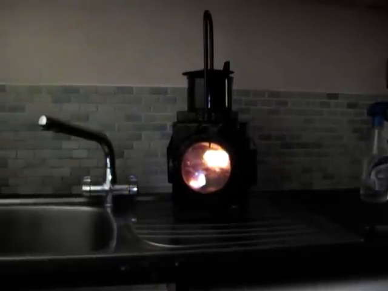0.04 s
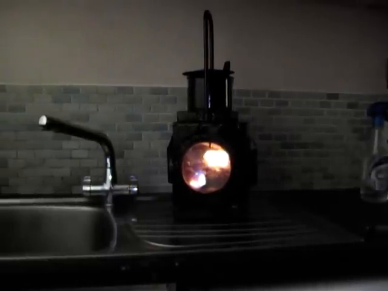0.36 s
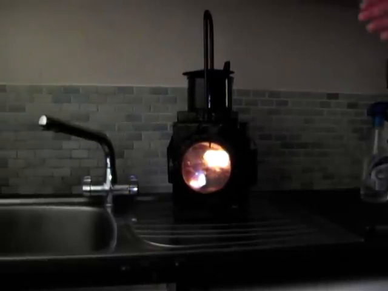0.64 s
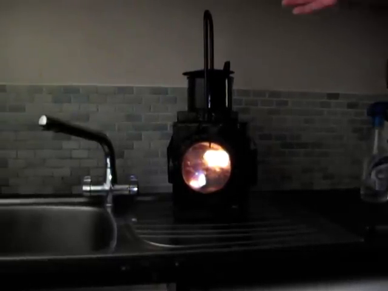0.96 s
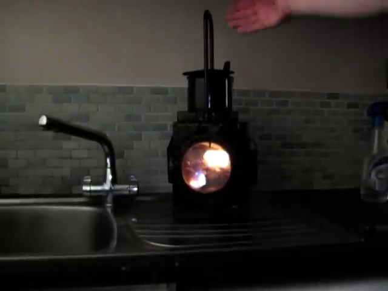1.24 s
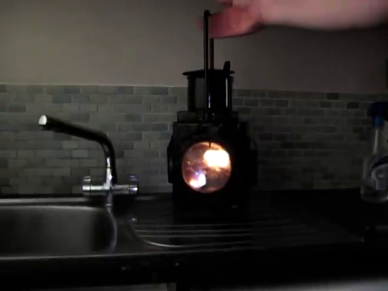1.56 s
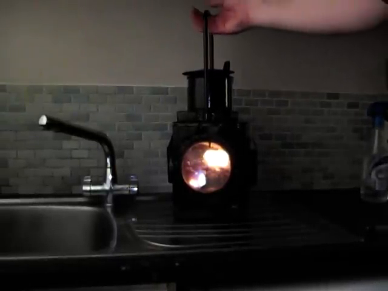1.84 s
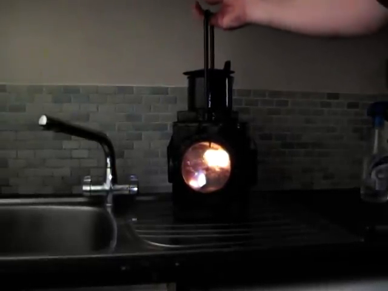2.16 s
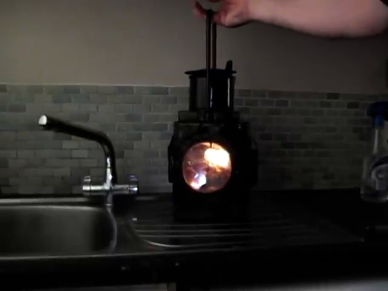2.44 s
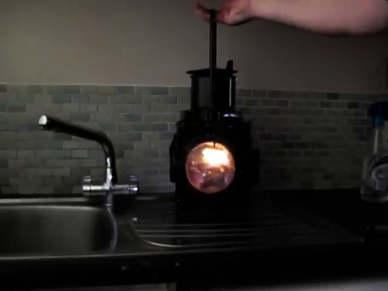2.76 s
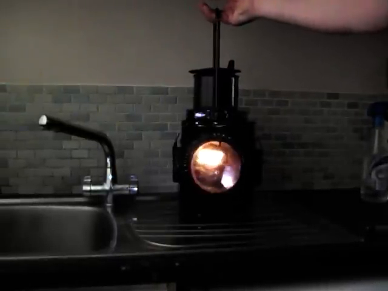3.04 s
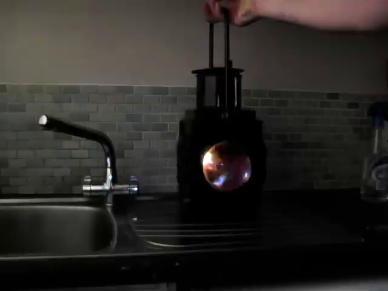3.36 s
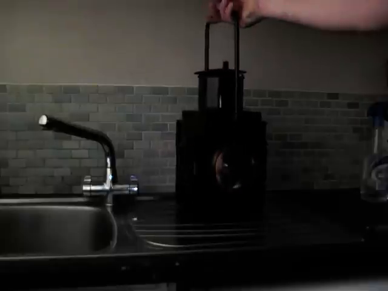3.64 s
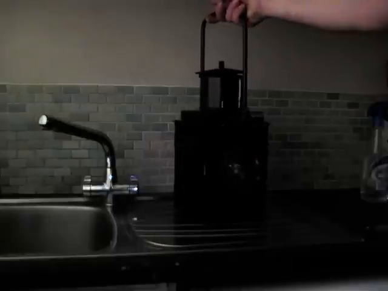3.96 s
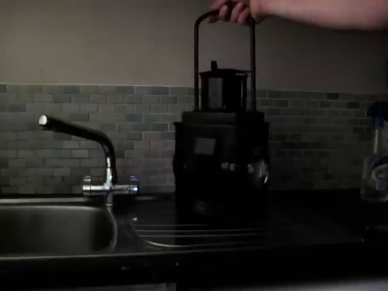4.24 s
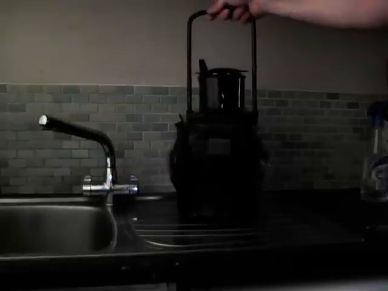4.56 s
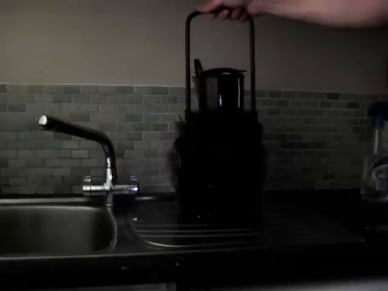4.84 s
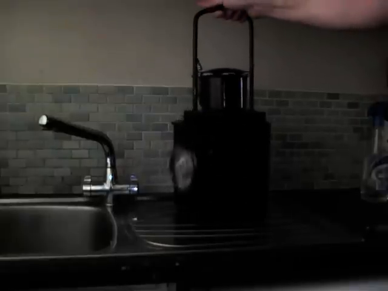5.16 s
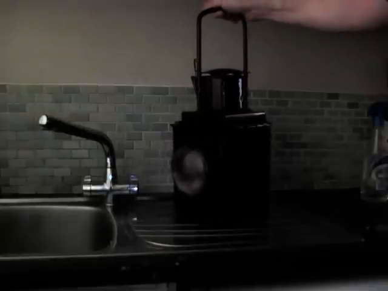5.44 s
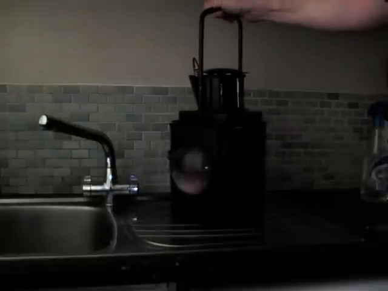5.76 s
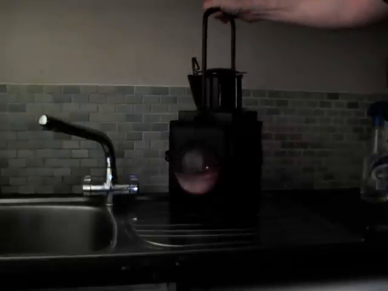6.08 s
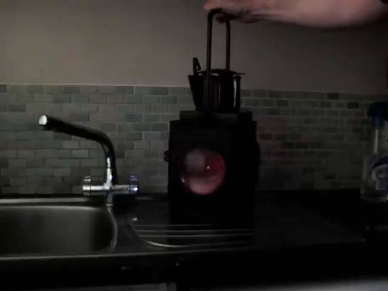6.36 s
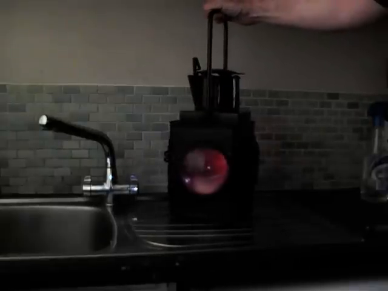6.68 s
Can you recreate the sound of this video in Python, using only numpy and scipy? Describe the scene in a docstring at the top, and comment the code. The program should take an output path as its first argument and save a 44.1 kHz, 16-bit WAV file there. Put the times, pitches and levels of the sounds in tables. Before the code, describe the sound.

A hand grips a steel lamp and turns it on a metal draining board, with ringing clunks, knocks and scraping.

```python
"""Paraffin lamp on a steel draining board

A hand rustles up to a steel paraffin lamp, grips its handle and turns it on a draining board.
The base catches on the ribs and drops with clunks that ring the thin sheet and the lamp's hollow body;
in between it drags, hisses and squeaks. A small kitchen's faint fan-like hum and hiss lie underneath."""
import sys
import numpy as np
from scipy import signal
from scipy.io import wavfile

SR = 44100
rng = np.random.default_rng(int(sys.argv[2]) if len(sys.argv) > 2 else 0)


def unload_wav(signal):
    """Save mono or channel-first audio to the path in sys.argv[1] as 16-bit WAV at rate SR, clipped to [-1, 1]."""
    wavfile.write(
        sys.argv[1],
        SR,
        np.round(np.clip(np.atleast_2d(signal).T, -1, 1) * 32767).astype(np.int16),
    )


N = 304731
BAND_EDGES = 25 * 2 ** np.arange(0, 9.5, .425)
BAND_HZ = np.sqrt(BAND_EDGES[1:] * BAND_EDGES[:-1])

# the base dropping on the board, and at 5.401 s scuffing it; boom is high mid-sheet and low near a rib: # (time
# [s], strength [dB], contact time [ms], boom [dB])
DROPS = [(3.743, -19, 0.035, -3), (3.845, -37, 0.014, -9), (3.853, -20.5, 0.21, -1.5),
         (3.957, -22.5, 0.041, -2), (4.044, -28, 0.15, -2), (4.175, -30, 0.34, -2), (4.276, -26, 0.85, -1),
         (4.552, -16.5, 1.7, 0.5), (4.662, -18, 0.21, 7), (4.667, -12, 0.32, -1),
         (4.799, -17.5, 0.33, -3.5), (4.901, -27.5, 0.078, -5), (5.121, -31, 0.015, 2.5),
         (5.222, -25.5, 0.36, -1), (5.236, -31.5, 0.0063, 1.5), (5.401, -32.5, 0.12, -1.5),
         (5.474, -22, 0.061, -0.5), (5.585, -20.5, 0.6, 2), (5.632, -23, 0.29, 0.5),
         (5.769, -34.5, 0.073, 4), (6.4, -34, 0.91, 0), (6.463, -16.5, 1.74, -0.5), (6.472, -37, 0.07, 1),
         (6.498, -19, 2.17, 3), (6.607, -32, 2.8, 2)]
# crowded overtones of sheet steel, blended by the room: (frequency [Hz], band level [dB])
STEEL_SPECTRUM = [(30, -29), (95, -7), (165, -2.5), (240, -7.5), (340, -6), (700, -7), (1100, -11.5),
                  (2200, -13), (3500, -8.5), (6500, -7), (9500, -3), (15000, -18.5)]
# how those overtones die away: (frequency [Hz], t60 [s])
STEEL_DECAY = [(60, 0.42), (170, 0.49), (400, 0.53), (800, 0.35), (2000, 0.26), (5000, 0.19), (9500, 0.18),
               (14000, 0.11)]
# modes of the lamp's body: (frequency [Hz], level [dB], t60 [s])
LAMP_MODES = [(159.5, 4.5, 0.52), (429.4, -0.5, 0.59), (787, -13, 0.47), (954, -2.5, 0.3), (1273, -5, 0.11),
              (1865, 0, 0.13)]
# stereo width of lamp, board and hand: (frequency [Hz], side minus mid [dB])
STEREO_WIDTH = [(100, -23.5), (1200, -20), (2400, -18), (4400, -12.5), (8000, -7), (14000, 2)]


def base_drops(bands):
    """The base falls off the ribs: the sheet clatters and booms, and the lamp rings along."""
    out = clatter(DROPS, drop_db, bands, level_db=-3.5)
    out += ringing(DROPS, drop_db, board_modes, level_db=-1.5)
    out += ringing(DROPS, drop_db, lambda s: LAMP_MODES, level_db=-20)
    return out + panel_shimmer()


def strike_db(blow, hz):
    """A blow's drive at each pitch: a long, soft contact thuds, a short, hard one ticks."""
    # how lamp and board answer a perfectly sharp blow: (frequency [Hz], level [dB])
    response = [(150, -7), (400, 1), (1500, 5.5), (8000, -2.5)]
    strength_db, contact_ms = blow[1:3]
    corner_hz = 1000 / (2 * contact_ms)
    treble_loss_db = 29 * np.log10(np.hypot(1, hz / corner_hz))
    return strength_db + at_hz(response, hz) - treble_loss_db


def drop_db(drop, hz):
    """A drop's drive at each pitch: boom feeds the sheet's main mode at the cost of the deep thud."""
    # where the boom goes: (frequency [Hz], share of the boom [ratio])
    boom_share = [(150, -1.1), (370, 1), (900, 0)]
    return strike_db(drop, hz) + drop[-1] * at_hz(boom_share, hz)


def clatter(blows, drive, bands, level_db, crack_db=8, crack_s=0.0045, crack_hz=2500,
            swell_s=0.0073, likeness=0.46, snap_db=19):
    """Dense steel overtones: the share `likeness` repeats, the rest changes as the contact point moves."""
    t, hz, out = np.arange(SR * 3 // 5) / SR, BAND_HZ[:, None], np.zeros((2, N))
    swell_hz, snap_hz, hard_contact_ms = 410, 8000, 0.12
    # bending waves spread through the sheet more slowly at low pitch
    swell = 1 - np.exp(-t / (swell_s * np.sqrt(swell_hz / hz)))
    # a hard contact snaps at once; early reflections follow as a crack
    snap = from_db(snap_db) * hz / (hz + snap_hz) * np.exp(-t / 0.0012)
    crack = from_db(crack_db) * hz / (hz + crack_hz) * np.exp(-t / crack_s)
    body = swell * (from_db(-60 * t / at_hz(STEEL_DECAY, hz)) + crack)
    repeated = likeness ** .5 * noise_bands(len(t), STEREO_WIDTH)
    for blow, start in zip(blows, rng.integers(0, N - len(t), len(blows))):
        s, _, contact_ms = blow[:3]
        gains = from_db(level_db + drive(blow, BAND_HZ) + at_hz(STEEL_SPECTRUM, BAND_HZ))
        envelope = body + snap / (1 + (contact_ms / hard_contact_ms) ** 2)
        fresh = (1 - likeness) ** .5 * bands[..., start:start + len(t)]
        add(out, s, np.tensordot(gains, envelope[:, None] * (repeated + fresh), 1))
    return out


def ringing(blows, drive, modes_at, level_db, spread_db=4.0, detune=0.0046, build_cycles=0.56):
    """Strong modes build over a cycle or so, a little different in pitch and level at every blow."""
    t, out = np.arange(SR // 2) / SR, np.zeros((2, N))
    for blow in blows:
        hz, mode_db, t60 = np.transpose(modes_at(blow[0]))
        strength, shift, sign = rng.standard_normal((3, len(hz)))
        attack = 1 - np.exp(-np.outer(hz, t) / build_cycles)
        decay = from_db(-60 * t / t60[:, None])
        gains = np.sign(sign) * from_db(level_db + mode_db + drive(blow, hz) + spread_db * np.tanh(strength))
        waves = np.sin(np.outer(2 * np.pi * hz * (1 + detune * shift), t)) * attack * decay
        add(out, blow[0], (pan(hz) * gains) @ waves)
    return out


def board_modes(s, main_t60_s=0.37):
    """The board's modes at time s: the main one shifts as the lamp's weight moves over the sheet."""
    # the sheet's steady modes: (frequency [Hz], level [dB], t60 [s])
    steady_modes = [(57, -14, 0.47), (107.5, -16.5, 0.78), (147.3, 1, 0.3), (182.5, -2.5, 0.38),
                    (227.8, -15.5, 0.85), (322.7, -6, 0.42), (515, -28, 0.29), (742.7, -6.5, 0.22),
                    (915, -21.5, 0.54), (1375, -17, 0.45), (2880, -8, 0.06)]
    # its main mode: (time [s], frequency [Hz], level [dB])
    main_mode = [(4.2, 357, -3), (4.6, 367.7, -4), (5.22, 357, 4), (5.47, 368.5, -7), (5.7, 403, -4)]
    times, hz, db = np.transpose(main_mode)
    return steady_modes + [(np.interp(s, times, hz), np.interp(s, times, db), main_t60_s)]


def panel_shimmer(level_db=-14, decay_scale=0.97, spread_db=6.5, count=60):
    """Thin modes of the lamp's panels: each drop brings out a different handful."""
    t, out = np.arange(SR * 2 // 5) / SR, np.zeros((2, N))
    hz = np.geomspace(520, 9000, count) * rng.uniform(.98, 1.02, count)
    t60 = decay_scale * at_hz(STEEL_DECAY, hz)
    waves = np.sin(np.outer(2 * np.pi * hz, t)) * from_db(-60 * t / t60[:, None])
    sides = stereo(1, rng.standard_normal(count), STEREO_WIDTH, hz)
    for drop, (strength, sign) in zip(DROPS, rng.standard_normal((len(DROPS), 2, count))):
        mode_db = level_db + drop_db(drop, hz) + at_hz(STEEL_SPECTRUM, hz) + spread_db * np.tanh(strength)
        add(out, drop[0], (sides * np.sign(sign) * from_db(mode_db)) @ waves)
    return out


def dragging(bands, rumble_db=7, singing_db=-9, singing_width_hz=33, flicker_db=4, grit_db=3.2):
    """The sliding base judders the board, grates over its fine scratches and sings faintly."""
    # pressure of the sliding base, heard as its hiss: (time [s], level [dB])
    pressure = [(3.3, -62.5), (3.62, -57), (4.07, -69.5), (4.29, -53.5), (4.7, -61), (4.97, -55.5),
                (5.34, -49), (5.47, -54), (5.84, -59.5), (6.44, -64), (6.6, -75.5), (6.9, -56.5)]
    # the juddering board: (frequency [Hz], density [dB])
    rumble_spectrum = [(35, -19), (60, -0.5), (160, 2), (240, -6.5), (360, 5.5), (550, -14.5), (750, -4),
                       (3000, -21), (8000, -37)]
    # steel grating on steel: (frequency [Hz], density [dB])
    hiss_spectrum = [(700, 6), (1800, 8), (3500, 4), (9500, 4), (13000, -3), (16000, -26)]
    # pitches at which the base sings: (frequency [Hz])
    singing_hz = [3087, 3580]
    pressure_db = in_time(pressure)
    ease_in = np.clip((np.arange(N) / SR - pressure[0][0]) / 0.36, 0, 1)
    rumble = np.hypot(from_db(pressure_db + rumble_db), rocking()) * coloured(bands, rumble_spectrum)
    # the hiss flickers at random in each band
    flicker = np.array([from_db(flicker_db * wobble(70).astype(np.float32)) for _ in BAND_HZ])
    grain = rms_one(from_db(grit_db * wobble(900)))
    grit = grain * coloured(bands[..., ::-1] * flicker[:, None], hiss_spectrum)
    singing = rms_one(sum(resonate(rng.standard_normal(N), hz, singing_width_hz) for hz in singing_hz))
    return ease_in * (rumble + from_db(pressure_db) * (grit + from_db(singing_db) * singing))


def rocking(judder_hz=256, level_db=-14, t60_s=0.46):
    """Envelope of the lamp's judder on the board, dying away after each drop."""
    t, power = np.arange(SR) / SR, np.zeros(N)
    for drop in DROPS:
        add(power, drop[0], from_db(drop_db(drop, judder_hz) + level_db - 60 * t / t60_s) ** 2)
    return np.sqrt(power)


def squeaks(waver=0.064):
    """Steel sticks and slips on steel in brief tones of unsteady pitch."""
    # stick-slip chirps: (time [s], frequency [Hz], level [dB], length [s])
    chirps = [(0.422, 532, -50.5, 0.019), (3.883, 1844, -23.5, 0.0093), (3.907, 1817, -29.5, 0.01),
              (4.145, 1910, -45.5, 0.014)]
    t, out = np.arange(SR // 3) / SR, np.zeros(N)
    for s, hz, level_db, length in chirps:
        pitch = hz * (1 + waver * wobble(618)[:len(t)])
        tone = np.sqrt(2) * np.sin(2 * np.pi * np.cumsum(pitch) / SR)
        add(out, s, from_db(level_db) * tone * stroke(t, length, tail_db=-5, tail_t60=0.21))
    return out


def lamp_clunks(bands):
    """The handle takes the weight and the lamp's hollow body shifts and rings."""
    # shifts of the body: (time [s], strength [dB], contact time [ms])
    clunks = [(2.532, -33.5, 0.16), (2.912, -43, 1.8), (3.446, -54.5, .5)]
    overtones = clatter(clunks, strike_db, bands, level_db=-0.5)
    return overtones + ringing(clunks, strike_db, lambda s: LAMP_MODES, level_db=-4.5)


def finger_taps(bands, handle_hz=855):
    """Fingers tick on the handle; the lows sound only as far as it passes them into the body."""
    # fingers landing: (time [s], strength [dB], contact time [ms], passed to the body [dB])
    taps = [(1.013, -43.5, 0.16, -4), (1.071, -44.5, 0.11, 3), (1.181, -31, 0.18, -15),
            (1.280, -34.5, 0.3, -27), (1.65, -37.5, 0.25, -7.5), (1.998, -33, 0.56, -23),
            (2.137, -37, 5.8, -1)]

    def tap_db(tap, hz):
        return strike_db(tap, hz) + tap[-1] / (1 + (hz / handle_hz) ** 4)

    return clatter(taps, tap_db, bands, level_db=-6.5, crack_db=-3, crack_s=0.0086, crack_hz=100,
                   swell_s=0.001, likeness=0, snap_db=14)


def scuffs(grain_db=2):
    """Hand and base scuff in grainy rubs, each through one broad resonance."""
    # short rubs: (time [s], length [s], level [dB], centre [Hz], width [Hz])
    rubs = [(0.147, 0.29, -64.5, 3400, 1490), (0.453, 0.095, -62.5, 3300, 2000),
            (0.986, 0.003, -57.5, 4700, 3950), (1.176, 0.035, -48.5, 2510, 500),
            (1.18, .1, -52, 6580, 5030), (1.306, 0.058, -54, 8200, 4500), (1.649, 0.08, -61, 5000, 7150),
            (3.556, 0.12, -60.5, 6950, 7000), (3.635, 0.11, -47, 426, 390), (3.879, 0.022, -43, 2250, 1190),
            (4.352, 0.011, -48, 7360, 8000), (4.373, 0.29, -51.5, 7700, 8000),
            (6.328, 0.049, -56.5, 2000, 5970), (6.329, 0.095, -43, 394, 340),
            (6.804, 0.099, -62, 3970, 8000)]
    t, out = np.arange(SR // 3) / SR, np.zeros((2, N))
    for s, length, level_db, hz, width_hz in rubs:
        mid, side = rng.standard_normal((2, len(t))) * from_db(grain_db * wobble(506)[:len(t)])
        rub = rms_one(resonate(stereo(mid, side, STEREO_WIDTH, hz), hz, width_hz))
        add(out, s, from_db(level_db) * rub * stroke(t, length, tail_db=3.5, tail_t60=0.34))
    return out


def sleeve_rustle(bands, level_db=3, hollow_db=-2.5):
    """Soft friction of skin and cloth with a faint hollow tone, gone once the grip is firm."""
    # hand and sleeve reaching for the handle: (time [s], level [dB])
    reach = [(0.0, -64), (0.59, -68), (0.91, -69.5), (1.18, -59.5), (2.17, -70), (2.4, -52.5)]
    # rubbing cloth: (frequency [Hz], density [dB])
    cloth_spectrum = [(100, -22), (600, 13), (2700, 4.5), (6000, 1), (10000, -6), (15000, -16)]
    fade_out = np.clip((reach[-1][0] - np.arange(N) / SR) / 0.35, 0, 1)
    hollow = from_db(hollow_db) * rms_one(resonate(rng.standard_normal(N), hz=308, width_hz=20))
    envelope = fade_out * from_db(in_time(reach) + level_db + wobble(43.2))
    return envelope * (coloured(bands, cloth_spectrum) + hollow)


def room_nulls(x):
    """The kitchen's standing waves cancel at a few pitches and hollow out the sound."""
    # notches at the listening spot: (frequency [Hz], width [Hz])
    nulls = [(78, 2.3), (212, 8.7), (268, 16.5), (860, 60)]
    for hz, width_hz in nulls:
        x = x - resonate(x, hz, width_hz)
    return x


def room_tone(air_db=-60.9, whine_hz=841, whine_db=-67):
    """Steady air noise under a fan's thin whine and rush."""
    # the kitchen's air: (frequency [Hz], density [dB])
    air_spectrum = [(25, -15), (59, -0.5), (92, -11), (153, 3), (217, -9.5), (545, -6.5), (734, -50),
                    (863, -47), (1070, -15.5), (2100, -15.5), (10500, -26), (15000, -39)]
    # its diffuse stereo spread: (frequency [Hz], side minus mid [dB])
    air_width = [(80, -7.5), (700, 0)]
    # narrow bands of fan noise: (centre [Hz], width [Hz], level [dB])
    fan_bands = [(918, 144, -65.5), (9440, 560, -74)]
    whine = from_db(whine_db) * np.sqrt(2) * np.sin(2 * np.pi * whine_hz * np.arange(N) / SR)
    rush = sum(from_db(db) * rms_one(resonate(rng.standard_normal((2, N)), hz, width_hz))
               for hz, width_hz, db in fan_bands)
    return from_db(air_db) * coloured(noise_bands(N, air_width), air_spectrum) + whine + rush


def stroke(t, length, tail_db, tail_t60):
    """Envelope of a rub: it swells and fades, then lingers in the room."""
    progress = np.minimum(t / length, 1)
    return np.sin(np.pi * progress) + progress * from_db(tail_db - 60 * t / tail_t60)


def noise_bands(size, width):
    """Equally loud narrow bands of stereo noise, shaped bands x 2 x size."""
    white, bands = rng.standard_normal((2, 2, size + SR // 4)), []
    for k, hz in enumerate(BAND_HZ):
        sos = signal.butter(2, BAND_EDGES[k:k + 2], "band", fs=SR, output="sos")
        mid, side = signal.sosfilt(sos, white[k % 2])[:, -size:]
        bands.append(rms_one(stereo(mid, side, width, hz)) * pan(hz))
    return np.array(bands, np.float32)


def coloured(bands, spectrum):
    """Mix the bands to a spectrum, rms 1."""
    gains = from_db(at_hz(spectrum, BAND_HZ)) * np.sqrt(BAND_HZ)
    return rms_one(np.tensordot(gains.astype(np.float32), bands, 1))


def stereo(mid, side, width, hz):
    """Left and right from mid and side, as wide as the width curve is at this pitch."""
    return mid + from_db(at_hz(width, hz)) * side * [[1], [-1]]


def pan(hz):
    """Left and right gain: the lows lean slightly left."""
    # stereo balance: (frequency [Hz], left minus right [dB])
    balance = [(300, 1.8), (1200, 1.1), (9000, -0.094)]
    return from_db(at_hz(balance, hz) * np.array([[.5], [-.5]]))


def resonate(x, hz, width_hz):
    """One resonance, gain 1 at its peak."""
    r = np.exp(-np.pi * width_hz / SR)
    feedback = [1, -2 * r * np.cos(2 * np.pi * hz / SR), r * r]
    return signal.lfilter(np.array([1, 0, -1]) * (1 - r * r) / 2, feedback, x)


def wobble(rate_hz):
    """Random drift with a spread of about 1."""
    return np.interp(np.arange(N) * rate_hz / SR, np.arange(N // 8), rng.standard_normal(N // 8))


def from_db(db):
    """Decibels to gain."""
    return 10 ** (np.asarray(db) / 20)


def rms_one(x):
    """Scale to unit rms."""
    return x / np.sqrt(np.mean(x ** 2) + 1e-20)


def in_time(curve):
    """Read a time curve at every sample."""
    return np.interp(np.arange(N) / SR, *np.transpose(curve))


def at_hz(curve, hz):
    """Read a curve on a log-frequency axis."""
    curve_hz, values = np.transpose(curve)
    return np.interp(np.log(hz), np.log(curve_hz), values)


def add(out, s, sound):
    """Mix a sound in from time s on."""
    start = round(s * SR)
    out[..., start:start + sound.shape[-1]] += sound[..., :N - start]


def scene():
    """Knocks, friction and the quiet kitchen."""
    bands = noise_bands(N, STEREO_WIDTH)
    steel = base_drops(bands) + dragging(bands) + lamp_clunks(bands)
    hand = finger_taps(bands) + sleeve_rustle(bands)
    return room_nulls(steel) + hand + scuffs() + squeaks() + room_tone()


def record(dry):
    """A steep low-pass takes off the very top."""
    cutoff_hz = 16300
    return signal.sosfilt(signal.ellip(10, .2, 80, cutoff_hz, fs=SR, output="sos"), dry)


dry = scene()
out = record(dry)
unload_wav(out)
```